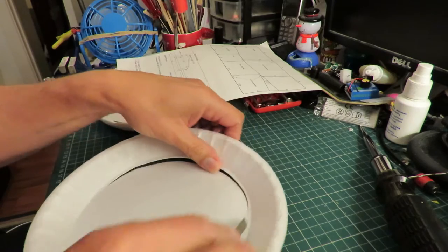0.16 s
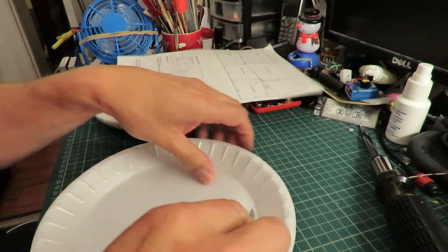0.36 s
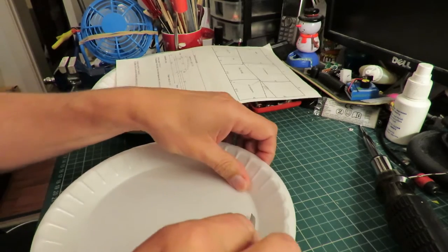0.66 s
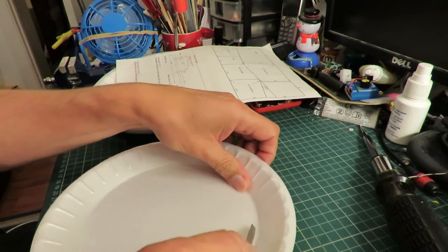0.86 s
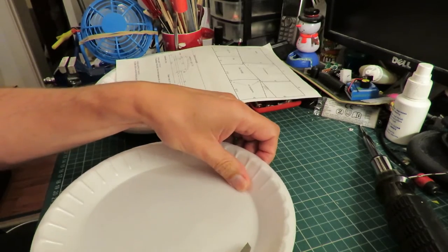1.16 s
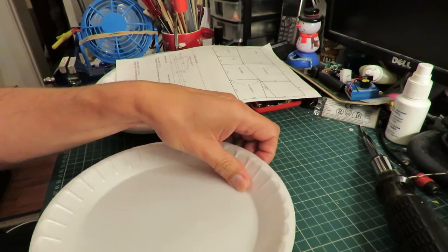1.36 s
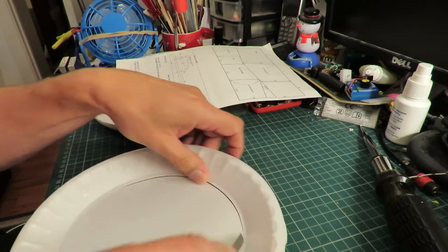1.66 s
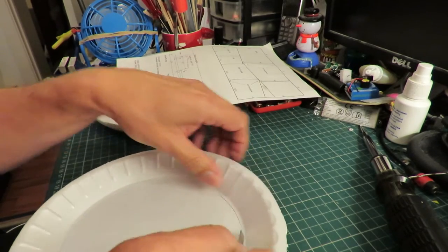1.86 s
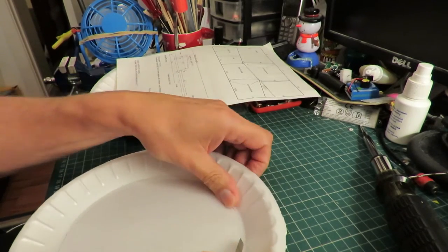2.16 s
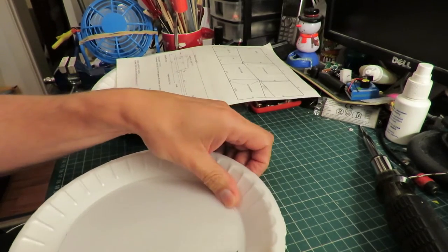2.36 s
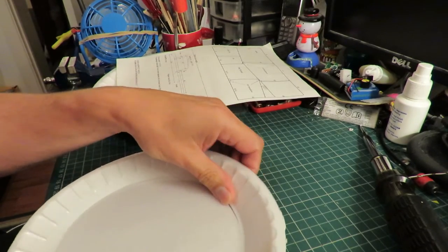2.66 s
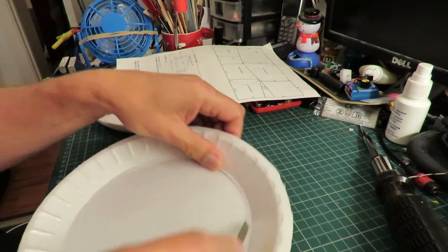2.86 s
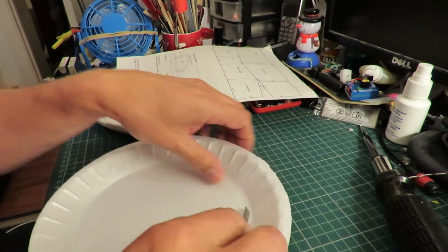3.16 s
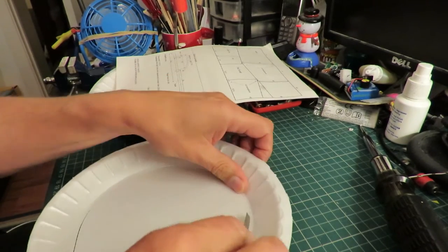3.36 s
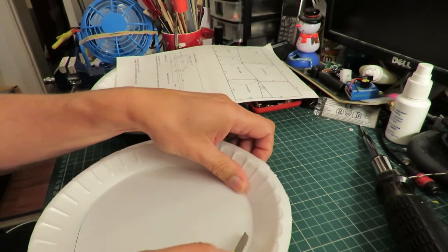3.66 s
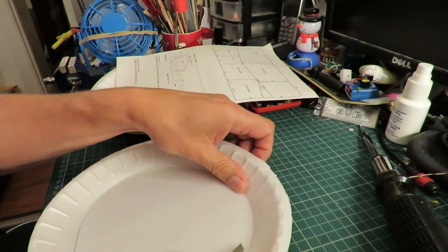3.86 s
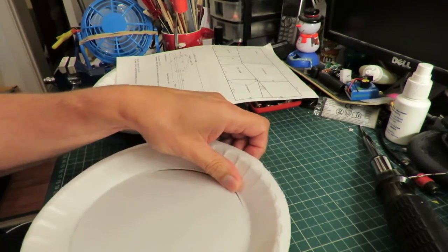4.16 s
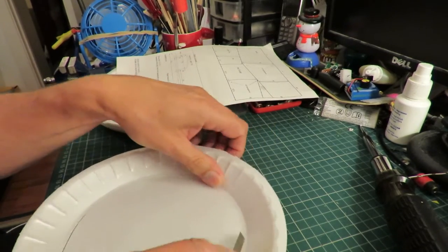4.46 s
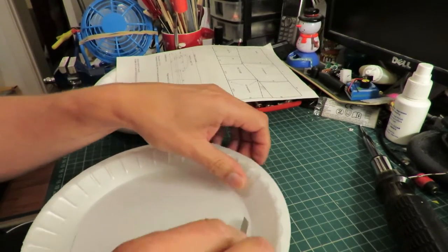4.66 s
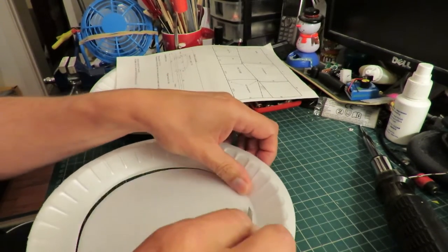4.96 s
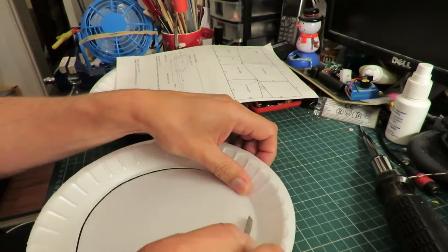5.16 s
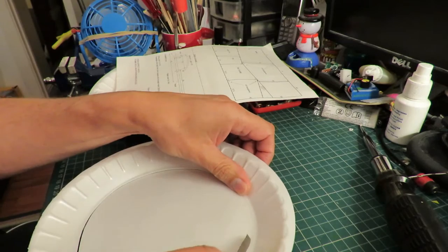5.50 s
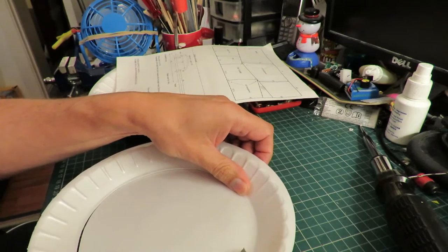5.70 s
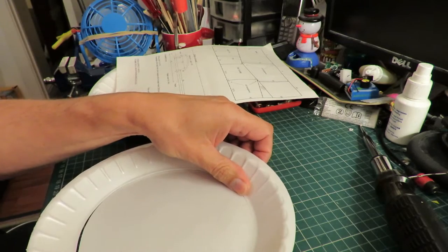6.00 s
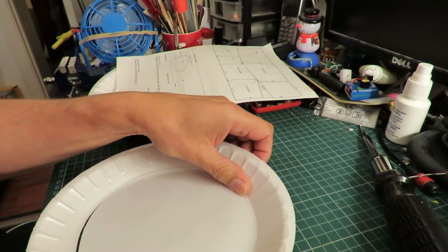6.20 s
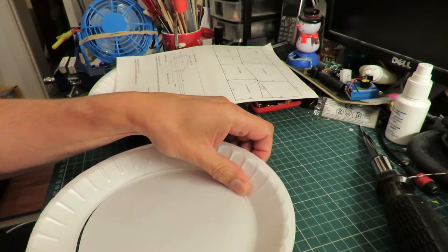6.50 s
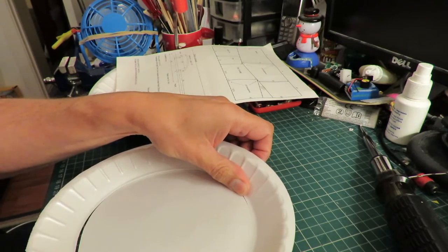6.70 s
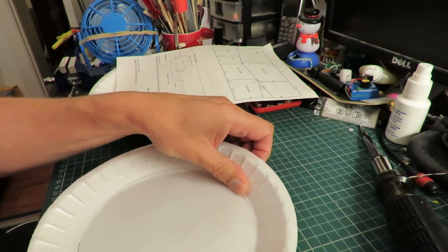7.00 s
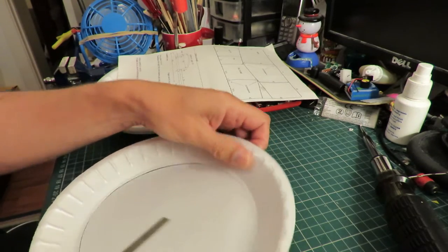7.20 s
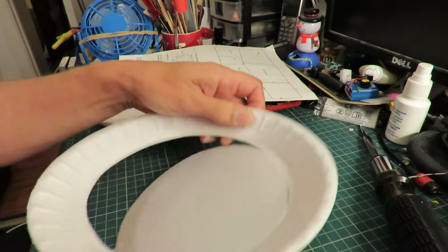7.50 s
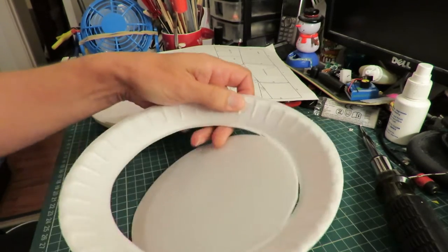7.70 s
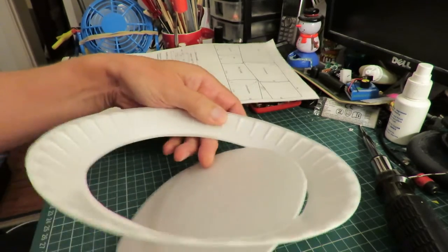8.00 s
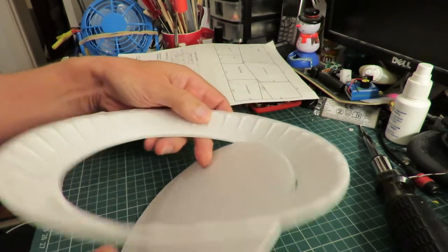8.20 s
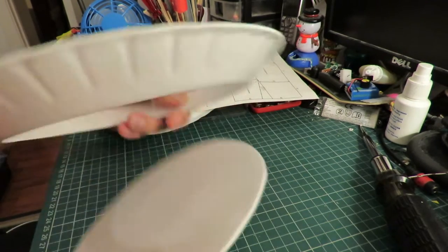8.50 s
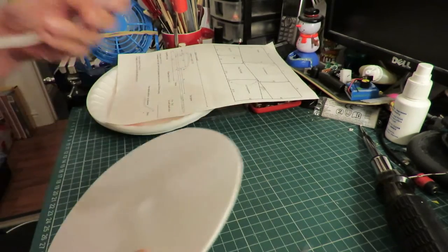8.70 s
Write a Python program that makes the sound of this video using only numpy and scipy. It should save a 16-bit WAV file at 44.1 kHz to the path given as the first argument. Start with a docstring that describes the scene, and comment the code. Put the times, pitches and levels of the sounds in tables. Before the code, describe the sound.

Close stereo pickup in a small, cluttered room with a faint steady hush. A foam plate rubs and snaps on a desk mat, then a blade drags through it in four gritty, scratchy strokes, the last the longest. Sharp hollow pops and brief scuffs separate them. Finally the cut rim is lifted away with scattered ticks, soft rubbing and a crisp double-sounding snap.

```python
"""A foam plate rubs and snaps on a desk mat in a small room; then a knife cuts a disc out in four strokes.
Rubbing and cutting are streams of tiny ruptures, filtered by the resonances of the plate.
Snaps are short pulses with a damped, ringing tail; each also jolts the low modes of the desk.
Soft bumps and scuffs, a brief squeak of the blade, a short reverberation and a steady room tone complete it."""
import sys
import numpy as np
from scipy import signal
from scipy.fft import rfft, irfft
from scipy.io import wavfile
from scipy.ndimage import uniform_filter1d

SR = 44100
rng = np.random.default_rng(int(sys.argv[2]) if len(sys.argv) > 2 else 0)


def waveform_to_disk(signal):
    """Save audio, clipped to [-1, 1], as 16-bit WAV at the path in sys.argv[1]."""
    frames = np.transpose(np.atleast_2d(signal))
    scaled = np.clip(frames, -1, 1) * 32767
    samples = np.round(scaled).astype(np.int16)
    wavfile.write(sys.argv[1], SR, samples)


N = 390285

FRAME, HOP = 1024, 256  # short-time spectrum [samples]
HZ = np.fft.rfftfreq(FRAME, 1 / SR)
USUAL_FORCE_DB = -33.5  # force level about which the contact changes its colour

# light rubbing of the held plate on the mat:
# (start [s], end [s], relative level [dB], low-shelf lift of the plate body [dB])
HANDLING = [(0.0, 0.557, -41.5, -1), (1.511, 2.05, -48.5, 0.5), (2.686, 3.309, -47.5, -4.5),
            (4.26, 5.076, -49.5, -2.5), (6.884, 7.013, -44, 5), (7.06, 8.577, -46, -2),
            (8.721, 8.855, -54, -7)]
# snaps and ticks of the foam: (time [s], relative level over 10 ms [dB], pitch [Hz],
# high-shelf lift or "fizz" [dB], share of energy in the first crack before the direct factor [0-1])
SNAPS = [(0.0317, -29, 1870, -13, 0.9), (0.0315, -17.5, 1520, -6.5, 1), (0.0802, -27, 880, -7, 0.5),
         (0.0893, -26.5, 1400, -40, 1), (0.153, -36, 1300, -3, 0.1), (0.4952, -26.5, 1780, -4, 0.2),
         (0.639, -33, 1060, -2, 0.4), (1.59, -29.5, 2060, 1, 0.4), (1.6584, -24, 1340, 0, 0.8),
         (1.6592, -15.5, 1700, -15, 0.74), (1.7117, -35, 1250, -5, 1), (2.052, -26.5, 1700, -8, 0.12),
         (2.135, -31, 2150, 1, 0.6), (2.7274, -25, 2060, -1, 0), (2.872, -27.5, 830, -10, 0.25),
         (2.967, -31.5, 1070, -14, 0.1), (3.071, -23, 1880, -2.5, 0.4), (3.135, -33, 1040, -28, 0.2),
         (4.235, -27, 3810, -3, 0.6), (4.2535, -19.5, 1030, -13, 1), (4.255, -14.5, 1530, -6, 1),
         (4.3784, -34.5, 1250, -8, 0.4), (5.057, -33.5, 2270, 1, 0.04), (6.894, -23.5, 1490, 6.5, 0),
         (6.9168, -21.5, 965, -36, 0.6), (7.0588, -20, 2170, -11, 1), (7.569, -37, 1510, -20, 0.5),
         (7.7645, -23, 1000, -10.5, 0.26), (7.935, -31.5, 1470, -11, 0.2), (7.953, -27.5, 1760, -12, 0.4),
         (7.965, -31, 1750, -14, 0.7), (7.984, -41, 1600, -14, 0.8), (8.044, -33, 1480, -16, 0.9),
         (8.127, -36, 1680, 3, 0.5), (8.142, -33, 1660, -9, 0.8), (8.2654, -39, 1580, -9, 0.6),
         (8.3302, -33, 930, -8, 0.4), (8.502, -29.5, 910, -20, 0.2), (8.5447, -19.5, 910, 1.5, 1),
         (8.5456, -18.5, 3600, -2, 0.96), (8.711, -45, 850, -10, 0)]
# basic spectrum of a snap: (frequency [Hz], relative level [dB])
SNAP_COLOUR = [(60, -24), (300, -32), (650, -11), (1000, -1), (1500, 3.5), (3300, -0.5), (5000, -4.5),
               (8000, -9), (12000, -14.5), (15500, -26)]


def gain_of(db):
    """Logarithmic level: converts decibels to amplitude."""
    return 10 ** (np.asarray(db) / 20)


def unit(x):
    """Energy normalization: scales the sum of squares to 1."""
    return x / np.sqrt(np.sum(x ** 2) + 1e-20)


def read(points, hz):
    """Logarithmic frequency scale: joins the points of a table along it."""
    f, value = np.transpose(points)
    return np.interp(np.log(hz + 1), np.log(f), value)


def add(mix, s, sound):
    """Superposition: adds a sound to the mix in place, from time s."""
    part = mix[max(round(s * SR), 0):][:len(sound)]
    part += sound[:len(part)]


def peaks_db(modes, hz):
    """Resonance: sums the bell-shaped lifts (or hollows) of a set of modes."""
    return sum(db / (1 + (2 * (hz - f) / width) ** 2) for f, width, db in modes)


def shelves_db(body_db, fizz_db, body_hz=1700, fizz_hz=5500):
    """Spectral tilt: a low shelf for the flexing plate and a high shelf for the sharp contact."""
    low_shelf = body_db / (1 + (HZ / body_hz) ** 4)
    high_shelf = fizz_db / (1 + (fizz_hz / (HZ + 1)) ** 4)
    return low_shelf + high_shelf


def causal(db):
    """Minimum phase: the Hilbert transform of the log gain gives the most compact causal pulse."""
    log_gain = np.log(gain_of(np.r_[db, db[-2:0:-1]]))
    spectrum = np.exp(np.conj(signal.hilbert(log_gain)))
    return unit(np.fft.ifft(spectrum).real)


def tinted(x, points):
    """Linear filtering: multiplies the spectrum of a whole track by a table of gains."""
    gain = gain_of(read(points, np.fft.rfftfreq(N, 1 / SR)))
    return irfft(rfft(x) * gain, N)


def drift(count, per_s):
    """Slow fluctuation: joins random knots of spread 1 by straight lines."""
    knots = np.arange(count) * per_s / SR
    return np.interp(knots, np.arange(SR), rng.standard_normal(SR))


def patches(count, frames, bins):
    """Random field: noise of spread 1, smoothed over so many time frames and frequency bins."""
    field = rng.standard_normal((2 * SR // HOP + 5, len(HZ)))
    field = uniform_filter1d(field, size=frames, axis=0)
    field = uniform_filter1d(field, size=bins, axis=1)
    return field[:count] / field.std()


def room_tone(level_db=-54.5):
    """Broadband noise: the low, steady rush of the room."""
    # (frequency [Hz], relative level [dB])
    tone_colour = [(25, -12), (110, -4.5), (143, 3), (190, -9), (280, 4.5), (440, 1.5), (900, -0.5),
                   (3000, -5.5), (8000, -16), (15000, -24)]
    return gain_of(level_db) * np.sqrt(N) * unit(tinted(rng.standard_normal(N), tone_colour))


def handling(start, end, rub_db, body_db, count=600, ends_db=-10):
    """Power addition: shoves swell over a light rub. Gives time, level, body and fizz."""
    # shoves that turn or lift the plate, each an arch that is ends_db down at its two ends:
    # (middle [s], length [s], relative peak level [dB], fizz before weighting by power share [dB])
    shove_rows = [(0.048, 0.16, -34, 10.5), (0.277, 0.055, -37, 3), (0.334, 0.022, -33, -6),
                  (0.371, 0.095, -29.5, 0.5), (0.442, 0.046, -33, 0), (0.507, 0.068, -36.5, -24),
                  (1.598, 0.25, -36, 9), (1.796, 0.17, -40, 5), (2.748, 0.071, -32.5, 4.5),
                  (2.953, 0.3, -40, -6), (3.183, 0.45, -38.5, -1.5), (4.385, 0.1, -39, 5.5),
                  (4.545, 0.14, -41.5, 2), (4.705, 0.054, -44.5, 3), (4.932, 0.29, -43, 1.5),
                  (6.906, 0.086, -33, 7), (7.117, 0.061, -35, 10), (7.23, 0.048, -44.5, 10),
                  (7.37, 0.049, -33.5, -7), (7.554, 0.13, -33, -1.5), (7.727, 0.18, -39, 2.5),
                  (7.889, 0.12, -37, -5), (8.036, 0.14, -34, 0.5), (8.145, 0.097, -34.5, -1),
                  (8.336, 0.043, -34, -2), (8.484, 0.035, -39, -1), (8.564, 0.1, -29, 7)]
    s = np.linspace(start, end, count)
    middle, length, db, fizz_db = np.transpose(shove_rows)
    arch_db = db + ends_db * (2 * (s[:, None] - middle) / length) ** 2
    shove_power = gain_of(arch_db) ** 2
    power = gain_of(rub_db) ** 2 + shove_power.sum(axis=1)
    return s, 10 * np.log10(power), np.full(count, body_db), shove_power @ fizz_db / power


def friction(force, colour_db, modes, per_s, spread_db, judder_db, judder_per_s, wander_db, rasp=0):
    """Stick-slip: tiny ruptures of uneven size, bunched in time, excite the resonances of the plate."""
    # plate under any rubbing: (frequency [Hz], width [Hz], lift [dB])
    plate_modes = [(1880, 1200, 1.5), (2385, 630, -4), (3190, 560, 5)]
    stutter_db, sway, sway_per_s = 1.0, 0.015, 45  # sway = spread as a share of mode pitch
    swell_db, swells_per_s = 1.1, 16  # the hand pushes unevenly
    rasp_hz, rasp_width_hz = 2680, 680  # a hard, fast pull tears the foam more brightly
    s, level_db, body_db, fizz_db = force
    t = np.arange(s[0], s[-1], 1 / SR)
    n = len(t)

    sizes = gain_of(spread_db * np.minimum(rng.exponential(1, n), 4.5)) * rng.choice([-1, 1], n)
    ruptures = sizes * (rng.random(n) < per_s / SR)
    grains = ruptures * gain_of(judder_db * drift(n, judder_per_s))
    _, frames, z = signal.stft(unit(grains) * np.sqrt(n), SR, nperseg=FRAME, noverlap=FRAME - HOP)

    def at_frames(curve):
        return np.interp(frames + s[0], s, curve)[:, None]

    # fine resonances shift as the contact point travels; broad patches flare as it stutters
    wander = patches(len(frames), frames=24, bins=3)
    stutter = patches(len(frames), frames=3, bins=10)
    plate_db = peaks_db(plate_modes, HZ) + wander_db * wander + stutter_db * stutter
    force_db = at_frames(level_db) - USUAL_FORCE_DB
    plate_db += rasp * force_db * peaks_db([(rasp_hz, rasp_width_hz, 1)], HZ)
    # harder pressure makes the driven resonances stand out; they sway as the contact rocks
    press = np.clip(2.5 + 0.15 * force_db, .3, 1.5)
    pitch = 1 + sway * drift(len(frames) * HOP, sway_per_s)[::HOP, None]
    driven_db = press * peaks_db(modes, HZ / pitch)
    gain = gain_of(colour_db + plate_db + driven_db + shelves_db(at_frames(body_db), at_frames(fizz_db)))
    gain /= np.sqrt(np.mean(gain ** 2, axis=1, keepdims=True))
    sound = signal.istft(z * gain.T, nperseg=FRAME, noverlap=FRAME - HOP)[1][:n]
    return s[0], sound * gain_of(np.interp(t, s, level_db) + swell_db * drift(n, swells_per_s))


def sliding(freed_s=7.0):
    """Stick-slip of plate on mat: coarse, lumpy grains, sparser and more uneven once the rim is free."""
    # (frequency [Hz], relative level [dB])
    slide_colour = [(60, -18.5), (400, -12), (700, -9.5), (1000, -1), (1400, -1), (2000, 3), (3200, -6),
                    (4500, -10.5), (7000, -19), (10000, -23.5), (13000, -26), (15000, -45)]
    # the freed rim: (frequency [Hz], width [Hz], lift before the factor for pressure [dB])
    rim_modes = [(1510, 640, 2.5), (3020, 780, -4)]
    out = np.zeros(N)
    for row in HANDLING:
        if row[0] > freed_s:
            modes, per_s, spread_db = rim_modes, 1000, 2.4
        else:
            modes, per_s, spread_db = [], 2500, 1
        add(out, *friction(handling(*row), read(slide_colour, HZ), modes, per_s, spread_db,
                           judder_db=2.0, judder_per_s=100, wander_db=2.8))
    return out * gain_of(0.47)


def blow(colour_db, share, t60, dull_db=-5, echo_s=0.0073, echo_db=-13):
    """Impulse response: a dulled pulse, one echo off the desk clutter and a lumpy, decaying ring; energy 1."""
    t = np.arange(SR // 4) / SR
    decay_db = 4.0 * drift(len(t), 280) - 60 * t / t60
    onset = 1 - np.exp(-t / 0.00088)
    ring = unit(rng.standard_normal(len(t)) * gain_of(decay_db) * onset)
    # the pulse loses treble progressively up to a third of the band
    pulse = causal(colour_db + dull_db * np.minimum(np.linspace(0, 3, len(colour_db)), 1))
    share = np.clip(share, 0, .95)
    sound = np.sqrt(1 - share) * unit(signal.fftconvolve(ring, causal(colour_db)))
    add(sound, 0, np.sqrt(share) * pulse)
    add(sound, echo_s, gain_of(echo_db) * np.sqrt(share) * pulse)
    return unit(sound)


def crackle(direct, per_s=22, over_rub_db=-5, share=0.13, ring_hz=1550, width_hz=1100, lift_db=8):
    """Random point process: small, dull snaps while the plate is handled, stronger with the rubbing."""
    rub = np.zeros(N)
    for row in HANDLING:
        s, level_db, _, _ = handling(*row)
        rub += np.interp(np.arange(N) / SR, s, gain_of(level_db), left=0, right=0)
    hits = gain_of(over_rub_db) * (rng.random(N) < per_s / SR)
    colour_db = read(SNAP_COLOUR, HZ) + peaks_db([(ring_hz, width_hz, lift_db)], HZ)
    snap = blow(colour_db, direct * share, t60=0.04)
    return np.sqrt(SR / 100) * signal.oaconvolve(rub * hits, snap)[:N]


def foam_ring(colour_db, grip_detune=0.02):
    """Modal decay: plate modes, each as strong as the snap is at its pitch, detuned by the grip; energy 1."""
    # (frequency before detuning [Hz], t60 [s])
    ring_modes = [(1220, 0.092), (1530, 0.087), (1900, 0.05), (2750, 0.039), (3430, 0.13)]
    t = np.arange(SR // 4) / SR
    hz, t60 = np.transpose(ring_modes)[:, :, None]
    hz = hz * (1 + grip_detune * rng.standard_normal(hz.shape))
    modes = gain_of(np.interp(hz, HZ, colour_db) - 60 * t / t60) * np.sin(2 * np.pi * hz * t)
    return unit(modes.sum(axis=0) * (1 - np.exp(-t / 0.0005)))


def snaps(direct, lift_db=9, octaves=0.43, t60=0.042, ring_db=-12):
    """Impulsive excitation: each crack centres on its own pitch and leaves the damped plate ringing."""
    out = np.zeros(N)
    for s, db, hz, fizz_db, share in SNAPS:
        bell = np.exp(-(np.log2((HZ + 1) / hz) / octaves) ** 2)
        colour_db = read(SNAP_COLOUR, HZ) + lift_db * bell
        sound = blow(colour_db + shelves_db(0, fizz_db), direct * share, t60)
        add(sound, 0, gain_of(ring_db) * foam_ring(colour_db))
        add(out, s, gain_of(db) * np.sqrt(SR / 100) * unit(sound))
    return out * gain_of(1.5)


def jolt(s, db, hz):
    """Coupling: louder and lower snaps jolt the desk more. Gives time [s], level [dB] and pitch [Hz]."""
    usual_db, usual_hz = -36, 1400
    level_db = -56 + 0.36 * (db - usual_db) - 4.5 * np.log2(hz / usual_hz)
    return s, level_db, 322


def bumps(direct, slope_db=2.5, t60=0.028, share=0.2):
    """Modal excitation: soft blows and the jolts of the snaps sound the low modes of the desk."""
    # hand and plate on the desk: (time [s], relative level over 40 ms [dB], pitch [Hz])
    bump_rows = [(2.133, -45, 362), (2.965, -44, 318), (4.255, -45, 400), (6.915, -30.5, 400),
                 (6.92, -51, 135), (7.687, -41, 397), (8.163, -44, 523)]
    # (frequency [Hz], width [Hz], lift [dB])
    desk_modes = [(75, 44, 11), (138, 20, 12.5), (267, 116, 14.5), (408, 79, 9)]
    out, hz = np.zeros(N), np.fft.rfftfreq(4096, 1 / SR)
    jolts = [jolt(s, db, snap_hz) for s, db, snap_hz, *_ in SNAPS]
    for s, db, pitch in bump_rows + jolts:
        octaves = np.log2((hz + 1) / pitch)
        steepness = np.where(octaves > 0, 1.7, .95)
        bell_db = np.maximum(-slope_db * octaves ** 2 * steepness, -70)
        sound = blow(bell_db + peaks_db(desk_modes, hz), direct * share, t60)
        add(out, s, gain_of(db) * np.sqrt(SR / 25) * sound)
    return out


def scuffs(slope_db=5, ends_db=-9):
    """Filtered friction noise: the pressed plate drags on the mat, a low rumble that swells and dies."""
    # (middle [s], length [s], relative peak level [dB], pitch [Hz])
    scuff_rows = [(0.384, 0.06, -45.5, 520), (0.532, 0.1, -45.5, 163), (3.292, 0.021, -47.5, 170),
                  (7.713, 0.086, -46, 393), (8.06, 0.081, -45, 258), (8.198, 0.15, -48, 437)]
    out, hz = np.zeros(N), np.fft.rfftfreq(4096, 1 / SR)
    t = np.arange(-SR // 4, SR // 4) / SR
    for middle, length, db, pitch in scuff_rows:
        colour_db = np.maximum(-slope_db * np.log2((hz + 1) / pitch) ** 2, -70)
        rumble = signal.fftconvolve(rng.standard_normal(len(t)), causal(colour_db))[:len(t)]
        add(out, middle + t[0], rumble * gain_of(db + ends_db * (2 * t / length) ** 2))
    return out


def stroke(curve, first_body_db, last_body_db, first_fizz_db, last_fizz_db, count=600):
    """Contact force: the knife bites, drags and lets go. Gives time, level, body and fizz."""
    bite_s, release_s, edge_db = 0.008, 0.026, -16  # level rises from and falls to edge_db below the drag
    flex_db, flex_s, pinning = 12, 0.16, 0.25  # pinning = dB of body lost per dB of force
    when, force_db = np.transpose(curve)
    s = np.linspace(when[0] - bite_s, when[-1] + release_s, count)
    drag_db = np.interp(s, when, force_db)
    outside = np.maximum((when[0] - s) / bite_s, 0) + np.maximum((s - when[-1]) / release_s, 0)
    # the plate flexes at the bite, then settles; more force pins it to the mat
    settling_db = flex_db * np.exp((s[0] - s) / flex_s)
    pinned_db = pinning * (drag_db - USUAL_FORCE_DB)
    body_db = np.linspace(first_body_db, last_body_db, count) + settling_db - pinned_db
    return s, drag_db + edge_db * outside, body_db, np.linspace(first_fizz_db, last_fizz_db, count)


def knife(travel_from_s=5.304, travel_s=0.43):
    """Dense fracture: the blade bursts an even stream of cells, and its position selects the plate modes."""
    # force through each of the four strokes: (time [s], relative level [dB])
    strokes = [
        [(0.563, -31), (0.585, -27.5), (0.621, -39.5), (0.753, -37.5), (0.805, -34.5), (0.883, -40.5),
         (0.917, -32.5), (1.023, -29.5), (1.067, -35), (1.459, -26.5), (1.5, -37.5)],
        [(2.053, -30.5), (2.141, -25), (2.175, -33.5), (2.305, -33), (2.331, -36), (2.463, -32), (2.589, -23),
         (2.669, -30.5), (2.7, -40)],
        [(3.333, -33), (3.434, -36.5), (3.466, -31.5), (3.6, -38), (3.64, -33), (3.698, -32.5), (3.828, -39.5),
         (3.922, -33), (4.052, -38.5), (4.225, -35.5)],
        [(5.07, -38), (5.12, -37.5), (5.184, -29), (5.314, -36), (5.658, -33), (6.102, -33), (6.486, -28.5),
         (6.594, -34.5), (6.724, -25), (6.87, -34.5)],
    ]
    # one set for each stroke and one for the end of the last:
    # (frequency before sway [Hz], width before sway [Hz], lift before the factor for pressure [dB])
    stroke_modes = [
        [(1310, 114, 6.5), (1590, 180, -5), (2176, 100, 4.5), (9900, 760, 2.5)],
        [(2250, 330, 2.5), (3230, 200, 3)],
        [(1670, 190, 3), (4580, 420, 2.5)],
        [(1810, 560, 3.5), (2480, 550, -5), (3116, 320, 8)],
        [(1020, 100, 3), (1470, 170, 5.5), (2340, 300, 4.5), (3080, 140, 1.5)],
    ]
    # contact in each stroke, body before flexing and pinning:
    # (first body [dB], last body [dB], first fizz [dB], last fizz [dB])
    contacts = [(-5.5, -3, 2.5, 1.5), (-4, -4.5, 1.5, 0.5), (-3.5, -2, 0, 4), (-4.5, 10, 5, 1)]
    # (frequency [Hz], relative level [dB])
    cut_colour = [(60, -36), (250, -18), (430, -12), (700, -18.5), (1000, -3), (1400, -1), (2000, 3.5),
                  (3200, -3), (4500, -8.5), (7000, -17), (10000, -17), (13000, -22), (15000, -36)]
    early, late = np.zeros(N), np.zeros(N)
    forces = [stroke(curve, *contact) for curve, contact in zip(strokes, contacts)]
    # the last stroke sounds with two sets of modes, crossfaded as the blade travels
    tracks = [early] * len(forces) + [late]
    for out, force, modes in zip(tracks, forces + [forces[-1]], stroke_modes):
        add(out, *friction(force, read(cut_colour, HZ), modes, per_s=5000, spread_db=1.2,
                           judder_db=1.0, judder_per_s=120, wander_db=3.3, rasp=0.32))
    travelled = np.clip((np.arange(N) / SR - travel_from_s) / travel_s, 0, 1)
    return (early * np.sqrt(1 - travelled) + late * np.sqrt(travelled)) * gain_of(-0.38)


def squeak(waver=0.04, rough_db=3.5, slips_per_s=700):
    """Stick-slip oscillation: the foam grips and frees the biting blade in two short, rough squeaks."""
    # (time [s], relative level before roughness [dB], pitch before wavering [Hz])
    squeak_curve = [(3.338, -55, 2200), (3.347, -28, 2165), (3.356, -50, 2180), (3.371, -30.5, 2260),
                    (3.39, -49, 2330)]
    s, level_db, hz = np.transpose(squeak_curve)
    t, out = np.arange(s[0], s[-1], 1 / SR), np.zeros(N)
    pitch = np.interp(t, s, hz) * (1 + waver * drift(len(t), slips_per_s))
    turns = np.cumsum(pitch) / SR
    grip_db = np.interp(t, s, level_db) + rough_db * drift(len(t), slips_per_s)
    add(out, s[0], np.sqrt(2) * gain_of(grip_db) * np.sin(2 * np.pi * turns))
    return out


def handwork(direct, desk_db=0):
    """Superposition of all sources; direct scales the first cracks, desk_db sets bumps and scuffs."""
    rubbing = sliding() + knife() + squeak()
    snapping = crackle(direct) + snaps(direct)
    return rubbing + snapping + (bumps(direct) + scuffs()) * gain_of(desk_db)


def room(x, wet_db, count=3):
    """Reverberation: sparse reflections off clutter and walls; random tails take turns in a steady cycle."""
    # reverberation time: (frequency [Hz], t60 [s])
    room_t60 = [(140, 0.19), (350, 0.16), (1500, 0.093), (14000, 0.15)]
    t, wet = np.arange(SR // 3) / SR, np.zeros(N)
    for k in range(count):
        taps = rng.standard_normal(len(t)) * (rng.random(len(t)) < 3000 / SR) * (t > .004)
        hz, frames, z = signal.stft(taps, SR, nperseg=256)
        decay = gain_of(-60 * frames / read(room_t60, hz)[:, None])
        tail = unit(signal.istft(z * decay, SR, nperseg=256)[1])
        # each tail's gain follows a 2 s cosine, staggered so that the total power holds
        turn = np.sqrt(2 / count) * np.cos(np.pi * (np.arange(N) / SR + k / count))
        wet += signal.fftconvolve(x * turn, tail)[:N]
    return (x + gain_of(wet_db) * wet) / np.hypot(1, gain_of(wet_db))


def scene():
    """Mid-side stereo: the plate lies ahead; scattered sound with a grain of its own gives the width."""
    # side filter before its overall gain: (frequency [Hz], relative level [dB])
    side_width = [(50, -28), (130, -5), (240, 0.5), (450, -2.5), (700, -2), (1200, -16), (2300, -15.5),
                  (4400, -11), (8000, -5.5), (13000, 0)]
    mid = room(handwork(direct=0.7), wet_db=-7.5) + room_tone()
    # direct = 0 leaves only the ringing of the blows
    scattered = room(handwork(direct=0, desk_db=-12.5), wet_db=-6.5) + room_tone()
    side = tinted(scattered, side_width) * gain_of(1.5)
    return np.array([mid + side, mid - side]) * gain_of([[.18], [-.18]])


def record(dry, low_cut_hz=30, edge_hz=15400):
    """Band limiting: the microphone sheds deep bass, peaks clip at full scale, then the treble is cut."""
    thinned = signal.lfilter(*signal.butter(2, low_cut_hz, "highpass", fs=SR), dry)
    low_pass = signal.firwin(255, edge_hz, window=("kaiser", 9), fs=SR)
    return signal.oaconvolve(np.clip(thinned, -1, 1), low_pass[None], "same")


dry = scene()
out = record(dry)
waveform_to_disk(out)
```